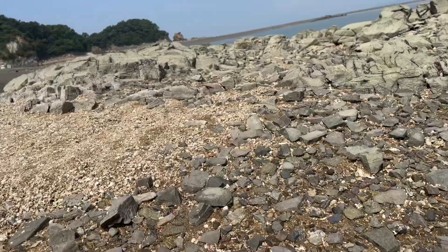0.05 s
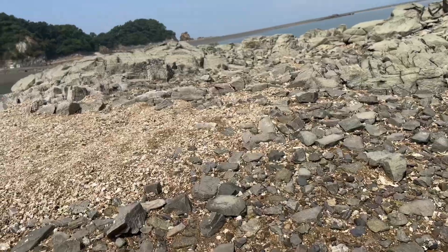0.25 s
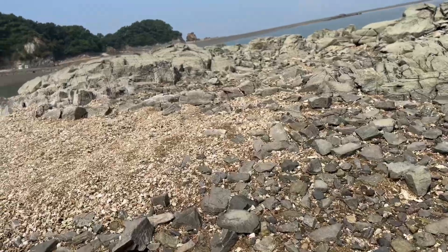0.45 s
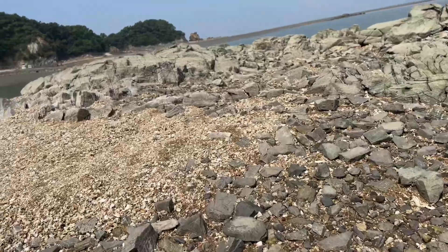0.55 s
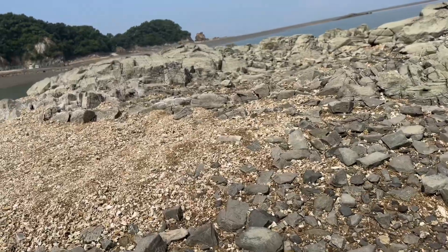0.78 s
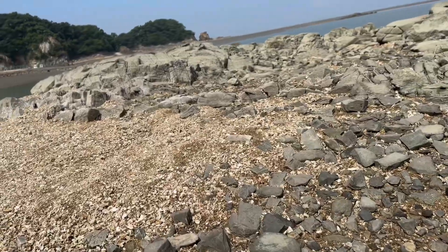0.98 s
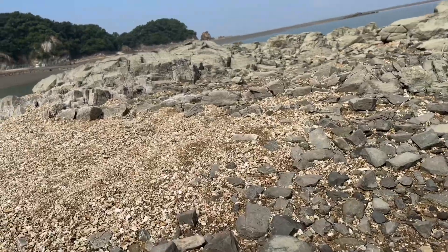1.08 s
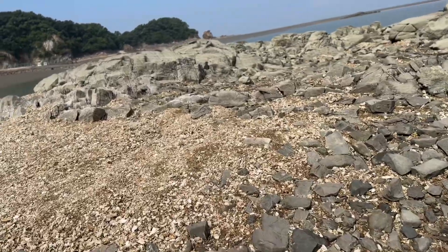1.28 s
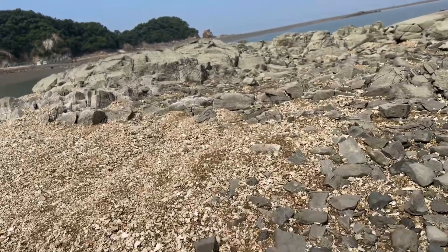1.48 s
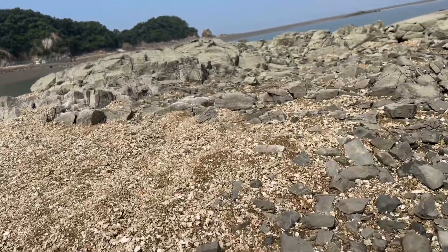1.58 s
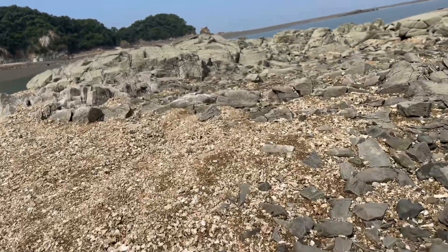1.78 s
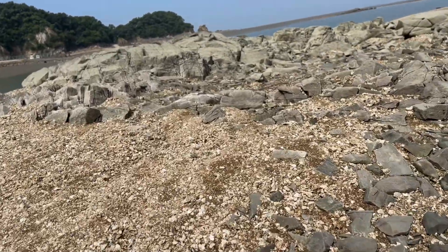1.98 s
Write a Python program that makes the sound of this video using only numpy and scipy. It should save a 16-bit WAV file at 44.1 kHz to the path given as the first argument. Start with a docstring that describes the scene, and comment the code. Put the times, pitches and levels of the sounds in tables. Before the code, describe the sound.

Footsteps crunch on loose pebbles and broken shells, close by in the open air. The loudest step lands at about 0.2 seconds with a hard stone knock and sharp shell snaps. Lighter steps follow around 1.1 and 1.75 seconds. Between them gravel trickles and single stones click. Low handling bumps and rumble come and go, strongest near 1 second, over a faint steady wind on the microphone.

```python
"""On a shore of loose pebbles and broken shells, three steps are heard from a hand-held phone.
Each sole grinds a crowd of dull pebbles and bright shell chips, made of thousands of tiny clicks.
Single stones knock, shells snap, and loose gravel trickles between the steps.
The hand shakes and bumps the phone, while a faint wind rumbles in the microphone."""
import sys
import numpy as np
from scipy import signal
from scipy.fft import rfft, irfft
from scipy.io import wavfile
from scipy.ndimage import uniform_filter1d

SR = 44100
rng = np.random.default_rng(int(sys.argv[2]) if len(sys.argv) > 2 else 0)


def to_wav(sig):
    """Store sig (one row per channel, or 1-D mono) as 16-bit WAV at the path in sys.argv[1].

    Samples outside -1..1 are clipped; the rate is SR.
    """
    pcm = np.clip(np.atleast_2d(sig), -1, 1) * 32767
    pcm = np.round(pcm).astype(np.int16)
    wavfile.write(sys.argv[1], SR, pcm.T)  # frames by channels


N = 90404

# how loud the loose gravel is (time [s], pebble level [dB], shell level [dB])
TRICKLE_LEVELS = [(0.0, -58, -71.5), (0.23, -62.5, -60), (0.29, -53, -60.5), (0.56, -74.5, -69.5),
                  (0.77, -75, -76), (0.88, -73, -71.5), (0.98, -82, -65.5), (1.1, -61, -57.5),
                  (1.13, -54, -58.5), (1.24, -60, -63), (1.65, -59.5, -66), (1.79, -66.5, -68.5),
                  (1.93, -58.5, -67), (2.05, -66.5, -73)]
# swells of rumble from the hand (middle [s], half length [s], level [dB], pitch [Hz])
HAND_SWELLS = [(0.037, 0.021, -54, 111.7), (0.282, 0.054, -49, 119), (0.385, 0.028, -53.5, 221.8),
               (0.555, 0.09, -54, 69), (0.619, 0.021, -50, 123.4), (0.706, 0.064, -47, 70),
               (0.87, 0.032, -50.5, 69), (0.996, 0.078, -39.5, 122.2), (1.058, 0.035, -30.5, 110.6),
               (1.184, 0.034, -38, 86.16), (1.243, 0.044, -42, 70.1), (1.319, 0.048, -53, 104.2),
               (1.441, 0.033, -43.5, 105.9), (1.522, 0.02, -58, 99.3), (1.754, 0.017, -49.5, 159.1),
               (1.9, 0.016, -51, 101.7)]
# single stones knocking (time [s], level [dB], pitch [Hz], left over right [dB])
STONE_KNOCKS = [(.033, -32.5, 1480, -1), (0.162, -32.5, 1460, -2), (0.2452, -7.5, 586, -3),
                (0.2505, -24.5, 415, 8), (.267, -22, 613, -5), (0.297, -23, 817, -11),
                (0.3008, -22, 770, -1), (0.313, -24, 880, -9), (0.3197, -52, 940, 1),
                (0.518, -45.5, 1160, -7), (.7725, -48, 1620, 0), (0.927, -40, 855, -6),
                (.990, -31.5, 790, -6), (1.0485, -36, 1280, -8), (1.0906, -35, 490, 2),
                (1.097, -29.5, 830, -5), (1.101, -33, 783, -2), (1.286, -43, 1560, 0),
                (1.3146, -40, 1110, 5), (1.376, -44.5, 724, 8), (1.421, -36, 1100, 0), (1.437, -32, 874, 0),
                (1.46, -39.5, 1070, -7), (1.465, -33, 970, 4), (1.597, -38, 1130, 0),
                (1.621, -43, 1410, -6), (1.7353, -35.5, 1100, 1), (1.745, -36, 910, 9),
                (1.753, -29.5, 580, -1), (1.7615, -26.5, 1684, 0), (1.7643, -22.5, 1243, -3),
                (1.773, -28, 1305, -4), (1.8579, -43.5, 1050, -3), (1.914, -38, 1110, -3.5)]
# shells snapping (time [s], level [dB], favoured pitch [Hz])
SHELL_SNAPS = [(0.038, -39.5, 1860), (.135, -45.5, 11000), (0.164, -41, 8900), (0.244, -21.5, 9000),
               (0.269, -30.5, 8500), (0.31, -33, 4500), (0.313, -35.5, 9000), (.424, -48.5, 7700),
               (0.5179, -47.5, 3020), (0.7363, -53.5, 1870), (0.7737, -46, 8560), (.927, -44.5, 3500),
               (0.9898, -47.5, 8000), (1.0181, -32, 14600), (1.049, -43, 1980), (1.098, -37, 11000),
               (1.102, -33.5, 11300), (1.126, -58, 9000), (1.423, -45, 3400), (1.459, -43.5, 3205),
               (1.4655, -39.5, 6360), (1.539, -44, 4800), (1.621, -42.5, 2940), (1.736, -43, 7000),
               (1.746, -45, 7000), (1.783, -41.5, 5450), (1.99, -53.5, 10300)]
# the foot pressing down
# (start [s], rise [s], hold [s], fall [s], pebble level [dB], pebble pitch [Hz], shell level [dB])
FOOT_PRESSES = [(0.186, 0.047, 0.09, 0.016, -39, 702, -42.5), (.97, 0.052, 0.043, 0.0067, -51, 970, -60),
                (1.077, 0.033, .034, 0.0078, -40.5, 840, -49.5),
                (1.116, 0.019, 0.0086, 0.006, -43.5, 2650, -60), (1.128, .01, .006, 0.0063, -41, 990, -70),
                (1.732, 0.0048, 0.045, 0.0096, -41.5, 1065, -49)]
# the hand bumping the phone (time [s], level [dB], pitch [Hz])
HAND_BUMPS = [(.243, -25.5, 184), (0.514, -40, 135), (0.662, -38, 215), (0.699, -32, 148.5),
              (.932, -31.5, 171), (1.443, -29.5, 163)]
# the tone of each sound and of the microphone, from low to high (frequency [Hz], level [dB])
TRICKLE_PEBBLE_TONE = [(150, -7), (350, -4.5), (650, -7), (1100, 0.5), (1700, -8), (2500, -11.5),
                       (5000, -24)]
TRICKLE_SHELL_TONE = [(1000, 11), (2500, 9), (4000, 3), (5500, 7), (7500, 0), (11000, -1), (14000, -22),
                      (16000, -21)]
WIND_TONE = [(20, -34.5), (40, -9), (65, 14.5), (110, -8), (200, -5.5), (400, -16.5), (1500, -45.5),
             (8000, -74)]
PEBBLE_TONE = [(120, -15.5), (300, -1.5), (600, -5.5), (1000, 4.5), (1400, -4.5), (2100, -9.5), (3200, -19),
               (6000, -68.5)]
SNAP_TONE = [(500, 16), (1500, 13), (3300, 0), (7500, -0.5), (11000, -1), (16000, 2)]
SHELL_TONE = [(600, -20), (1600, -14), (3300, 0), (4500, -7), (7200, -3), (9000, -3.5), (11000, -5),
              (16000, -2.5)]
MICROPHONE_TONE = [(6000, 0.5), (7200, 2.5), (8600, 1), (9600, -6.5), (11000, 4.5), (12600, -9),
                   (14000, -2.5), (15300, -5.5), (16300, -20.5)]
# how much louder the left microphone opening is than the right (frequency [Hz], difference [dB])
LEFT_LEVEL = [(200, 1), (700, -2), (1300, 0), (2400, 2.5), (4400, 10.5), (8000, 1.5), (15000, -1)]
# how far the left wave runs ahead; below zero it lags (frequency [Hz], lead [radians])
LEFT_LEAD = [(0, 0), (1000, -.85), (2200, -1.5), (3900, -2.6), (4700, -.7), (7800, -.1), (9600, -3.1),
             (11100, -6.3), (12700, -9.4), (14300, -12.6), (16000, -16)]

PEBBLE_HZ = 1000  # the pitch at which PEBBLE_TONE is strongest
PEBBLE_WIDTH, SHELL_WIDTH = 0.11, 0.87  # 0 sits in the middle, 1 spreads wide


def undb(db):
    """Turn decibels into a number to multiply by."""
    return 10 ** (np.asarray(db) / 20)


def unit(x):
    """Scale a sound so its average strength (rms) is 1."""
    return x / np.sqrt(np.mean(x ** 2) + 1e-20)


def pan(x, db):
    """Place a sound by making the left side db louder than the right."""
    gains = undb(np.array([[db], [-db]]) / 2)
    return x * gains / gains.mean()


def spread(mid, side, width):
    """Make left and right: side is added on the left and taken away on the right."""
    return mid + width * side * np.array([[1], [-1]])


def colour(x, tone, ripple_db=0, stretch=1):
    """Give a sound a tone; ripple_db adds random peaks and dips, and stretch multiplies the pitch."""
    hz, db = np.array(tone, float).T
    f = np.maximum(np.fft.rfftfreq(1024, 1 / SR), 1)
    shape_db = np.interp(np.log(f), np.log(hz * stretch), db)
    ripple_hz = np.geomspace(200, 17000, 36)
    shape_db += ripple_db * np.interp(f, ripple_hz, rng.standard_normal(len(ripple_hz)))
    # build a filter that rings only after each click, never before it
    cepstrum = irfft(np.log(undb(shape_db)))
    cepstrum[1:len(f) - 1] *= 2
    cepstrum[len(f):] = 0
    ring = irfft(np.exp(rfft(cepstrum)))
    return signal.oaconvolve(np.atleast_2d(x), ring[None], axes=1)[:, :np.shape(x)[-1]]


def grains(per_s, uneven_db, tone, width, stretch=1, kinds=8):
    """Many grains collide in weak and strong clicks; each kind of grain has its own ring and place."""
    out = 0
    for _ in range(kinds):
        strength = undb(uneven_db * np.minimum(rng.exponential(size=N), 4))
        sign = np.sign(rng.random(N) - .5)
        clicks = strength * sign * (rng.random(N) < per_s / kinds / SR)
        mid, side = (unit(colour(clicks, tone, ripple_db=5.5, stretch=stretch)) for _ in range(2))
        out = out + spread(mid, np.roll(side, rng.integers(4, 30)), width)
    return unit(out)


def thud(start, hz, cycles=2.828, sag=.65):
    """A dull blow: a few swings that drop in pitch as the contact gives way."""
    progress = np.clip((np.arange(N) / SR - start) * hz / cycles, 0, 1)
    phase = 2 * np.pi * cycles * (progress + sag * progress * (1 - progress))
    return np.sin(np.pi * progress) ** 2 * np.sin(phase)


def burst(start, decay_s, tone, width, stretch=1, samples=4096):
    """A splintering crack: noise that dies away fast, with its own ring."""
    fade = np.exp(-np.arange(samples) / SR / decay_s)
    noises = rng.standard_normal((2, samples)) * fade
    mid, side = (unit(colour(noise, tone, ripple_db=2, stretch=stretch)) for noise in noises)
    crack = spread(mid, side, width) * np.sqrt(np.mean(fade ** 2))
    return np.pad(crack, ((0, 0), (max(int(start * SR), 0), N)))[:, :N]


def trickle(pebble_boost_db=2.5, shell_boost_db=1.5):
    """Loose gravel keeps shifting between the steps."""
    t = np.arange(N) / SR
    times, pebble_db, shell_db = np.array(TRICKLE_LEVELS).T
    pebbles = grains(per_s=2200, uneven_db=3.5, tone=TRICKLE_PEBBLE_TONE, width=0.25)
    shells = grains(per_s=4400, uneven_db=3.5, tone=TRICKLE_SHELL_TONE, width=SHELL_WIDTH)
    pebbles *= undb(np.interp(t, times, pebble_db) + pebble_boost_db)
    shells *= undb(np.interp(t, times, shell_db) + shell_boost_db)
    return pebbles + shells


def wind(level_db=-62):
    """A faint, steady wind makes a low noise in the microphone."""
    noise = spread(*rng.standard_normal((2, N)), width=0.63)
    return undb(level_db) * unit(colour(noise, WIND_TONE))


def hand_rumble(waver_share=0.164, band_width=.5, noise_db=-6):
    """The phone shudders in the hand: a low, wavering note with noise around it swells and fades."""
    t = np.arange(N) / SR
    f = np.fft.rfftfreq(N, 1 / SR) + 1
    out = 0
    for middle, half_length, db, hz in HAND_SWELLS:
        swell = np.exp(-((t - middle) / half_length) ** 2)
        waver = unit(uniform_filter1d(rng.standard_normal(N), size=400))
        pitch = hz * (1 + waver_share * waver)
        shudder = np.sqrt(2) * np.sin(2 * np.pi * np.cumsum(pitch) / SR)
        band = np.exp(-.5 * (np.log(f / hz) / band_width) ** 2)
        mid, side = unit(irfft(rfft(rng.standard_normal((2, N))) * band, N))
        out = out + undb(db) * swell * spread(shudder + undb(noise_db) * mid, side, width=0.65)
    return out


def stone_knocks(cycles=2.828, jostle_db=-17, jostle_s=0.0057):
    """A stone strikes its bed, then jostles its neighbours."""
    out = 0
    for start, db, hz, pan_db in STONE_KNOCKS:
        jostle = burst(start + cycles / hz, jostle_s, PEBBLE_TONE, PEBBLE_WIDTH, hz / PEBBLE_HZ)
        knock = thud(start, hz, cycles) + undb(jostle_db) * jostle
        out = out + undb(db) * pan(knock, pan_db)
    return out


def shell_snaps(decay_s=0.0013, cut_db_per_octave=7.5, trim_db=-1):
    """Shells crack with a tick, brighter the smaller the chip."""
    out = 0
    for start, db, hz in SHELL_SNAPS:
        tone = [(f, level - cut_db_per_octave * abs(np.log2(f / hz))) for f, level in SNAP_TONE]
        out = out + undb(db + trim_db) * burst(start, decay_s, tone, SHELL_WIDTH)
    return out


def crunches(settle_db=-16, settle_s=0.11):
    """The sole presses, holds and lets go; pebbles and shells grind under it, then slowly settle."""
    t = np.arange(N) / SR
    shells = grains(per_s=2400, uneven_db=3.5, tone=SHELL_TONE, width=SHELL_WIDTH)
    out = 0
    for start, rise, hold, fall, pebble_db, hz, shell_db in FOOT_PRESSES:
        press = np.clip((t - start) / rise, 0, 1)
        since_lift = np.maximum(t - start - rise - hold, 0)
        fade = np.maximum(np.exp(-since_lift / fall), undb(settle_db) * np.exp(-since_lift / settle_s))
        pebbles = grains(per_s=2000, uneven_db=7, tone=PEBBLE_TONE, width=PEBBLE_WIDTH,
                         stretch=hz / PEBBLE_HZ)
        pebbles *= press  # they lie under the shells and give way later
        out = out + press * fade * (undb(pebble_db) * pebbles + undb(shell_db) * shells)
    return out


def hand_bumps():
    """The hand bumps the phone with a few low thuds."""
    return sum(undb(db) * thud(start, hz) for start, db, hz in HAND_BUMPS)


def scene():
    """Everything sounds close by, in the open air."""
    return crunches() + stone_knocks() + shell_snaps() + trickle() + wind() + hand_rumble() + hand_bumps()


def record(dry, top_hz=16300):
    """The phone's two openings differ in level and delay and colour the highs; the very top is cut."""
    f = np.fft.rfftfreq(N, 1 / SR)
    hz, db = np.array(LEFT_LEVEL).T
    left_db = np.interp(np.log(f + 1), np.log(hz), db)
    lead = np.interp(f, *np.array(LEFT_LEAD).T)
    left = undb(left_db / 2) * np.exp(1j * lead)
    right = undb(-left_db / 2)
    heard = irfft(rfft(dry) * np.array([left, right]), N)
    top_cut = signal.ellip(8, .2, 70, top_hz, fs=SR, output="sos")
    return signal.sosfilt(top_cut, colour(heard, MICROPHONE_TONE))


dry = scene()
out = record(dry)
to_wav(out)
```